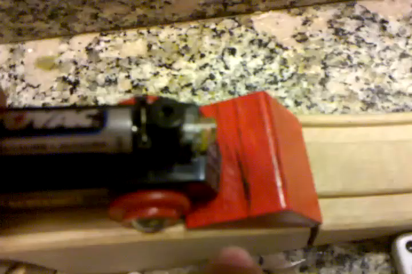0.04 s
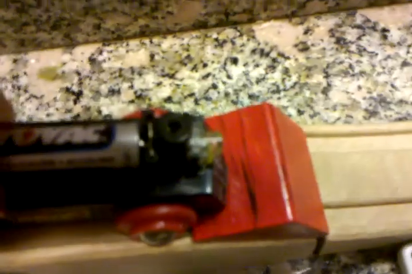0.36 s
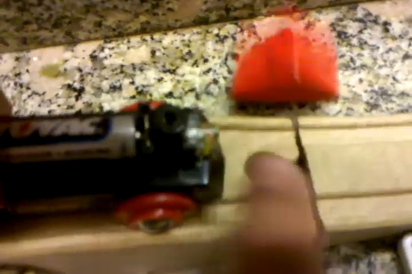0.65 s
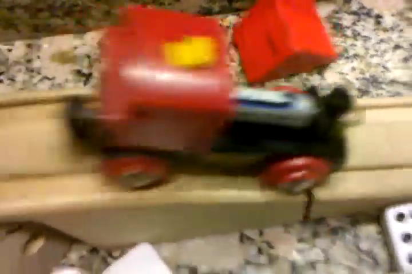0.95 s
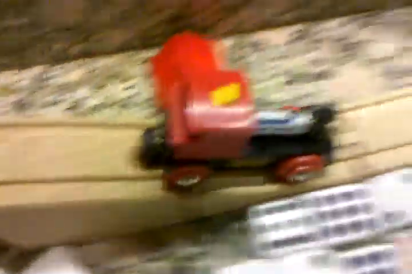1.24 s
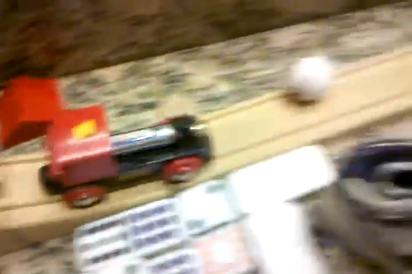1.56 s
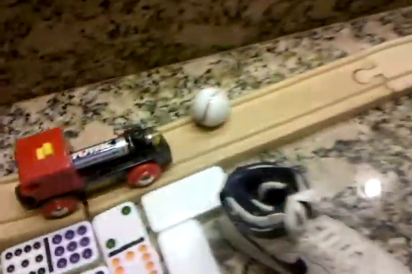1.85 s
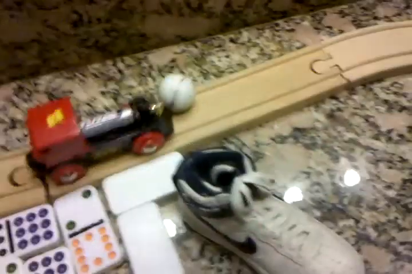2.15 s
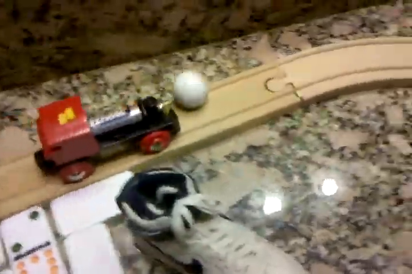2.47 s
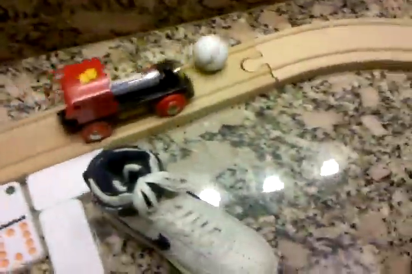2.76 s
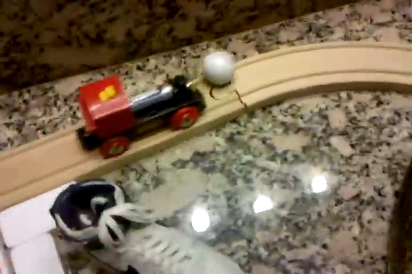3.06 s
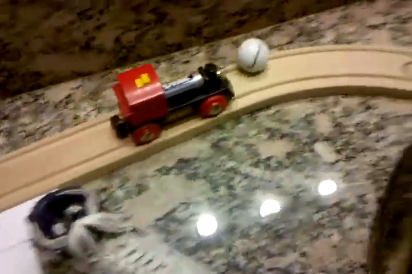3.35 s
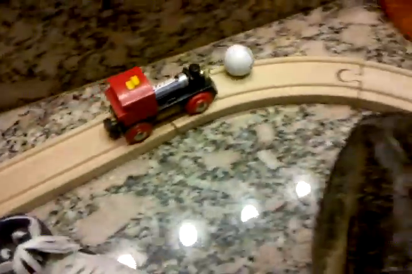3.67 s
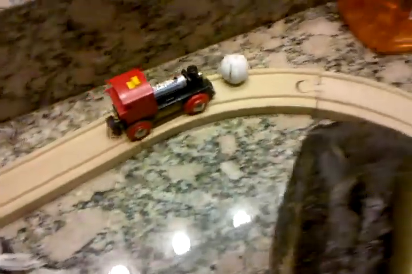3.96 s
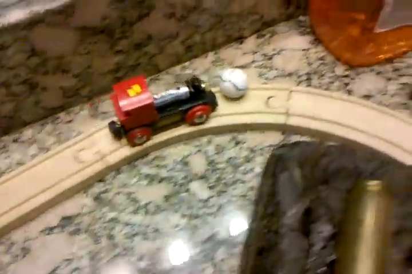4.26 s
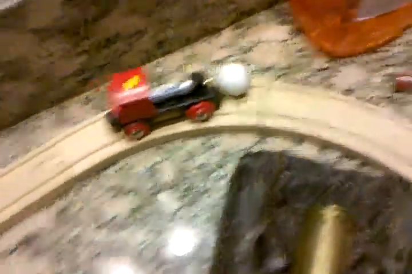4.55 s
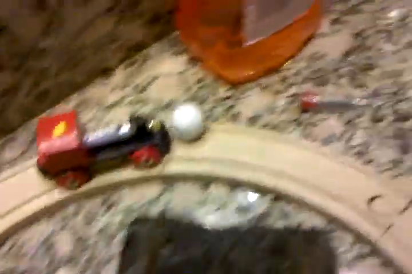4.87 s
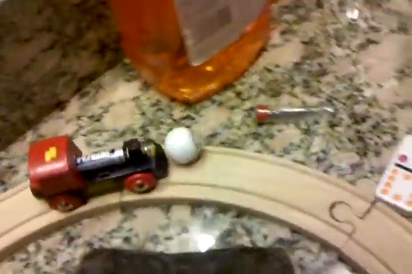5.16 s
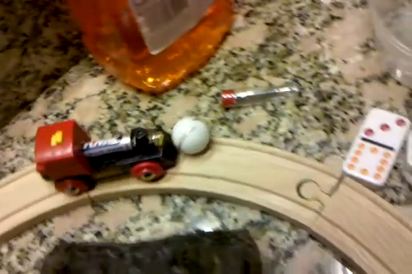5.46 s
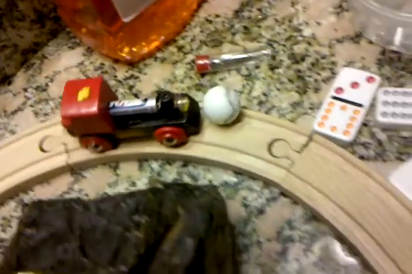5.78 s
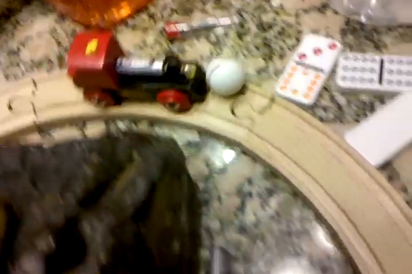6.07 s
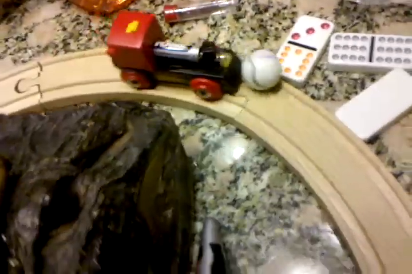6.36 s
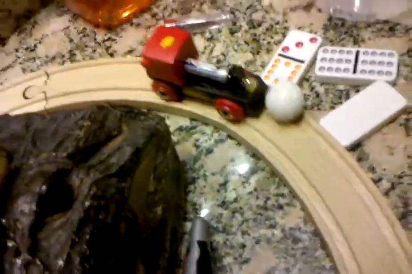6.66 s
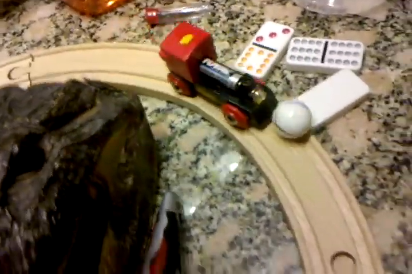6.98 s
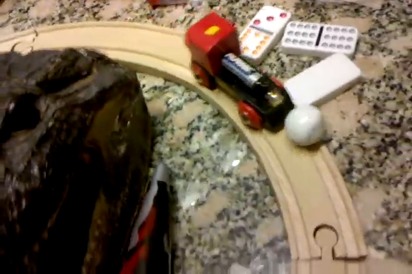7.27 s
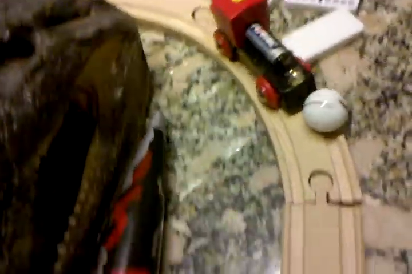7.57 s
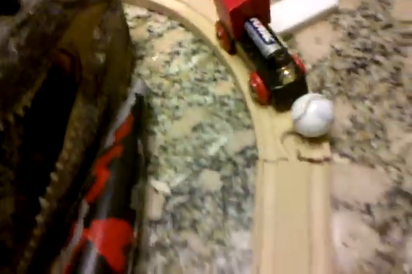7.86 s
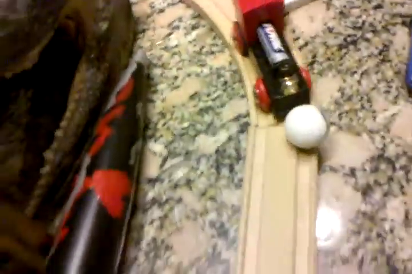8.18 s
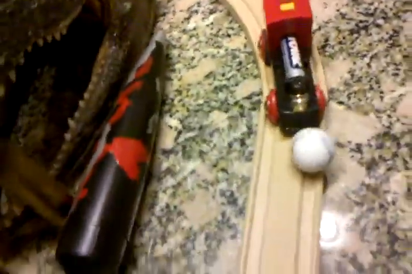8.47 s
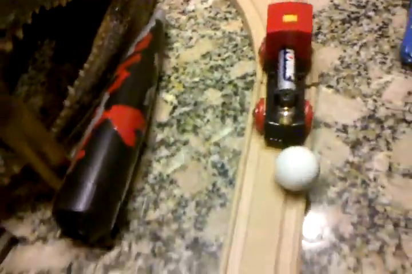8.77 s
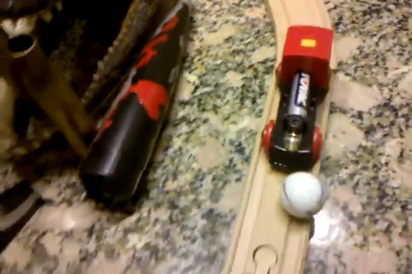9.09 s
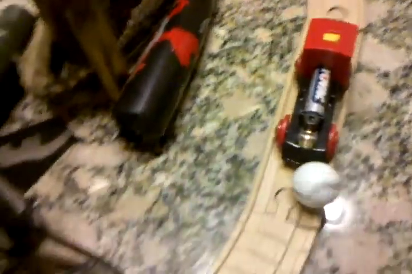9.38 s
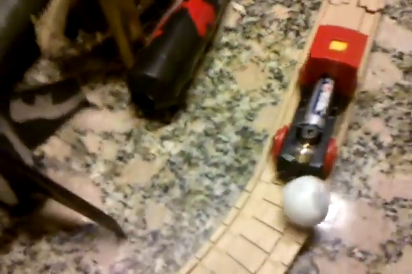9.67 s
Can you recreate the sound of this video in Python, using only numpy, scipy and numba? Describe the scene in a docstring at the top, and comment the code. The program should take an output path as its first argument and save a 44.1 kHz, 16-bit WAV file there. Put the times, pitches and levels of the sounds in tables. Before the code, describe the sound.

Plastic gears snap, then a toy train's motor runs with a high, wavering whir, its wheels rumbling softly over wood.

```python
"""A stone counter in a small hard room: a battery toy train runs on a wooden track, pushing a ball.
Its plastic gears snap and grind as it sets off, then whir as loose, uneven tooth strikes ring the
engine's parts. Wheels and ball rumble and bump on the wood, and the shaking engine makes the track
drone. A few dull knocks sound close to the microphone, something clinks once, an appliance hums."""
import sys
import numpy as np
from scipy import signal
from scipy.fft import rfft, irfft
from scipy.io import wavfile
from scipy.ndimage import uniform_filter1d
from numba import njit

SR = 44100
rng = np.random.default_rng(int(sys.argv[2]) if len(sys.argv) > 2 else 0)


def digitize_waveform(pressure):
    """Quantize a signal to 16-bit integers and store it at the path in sys.argv[1].

    Rows of a 2-D input are taken as channels; values are limited to [-1, 1].
    """
    field = np.atleast_2d(pressure).T
    bounded = np.clip(field, -1, 1)
    quanta = np.round(bounded * 32767).astype(np.int16)
    wavfile.write(sys.argv[1], SR, quanta)


N = 437913
TIME_S = np.arange(N) / SR

MOTOR_HZ, SLOWING_HZ_PER_S, SAG_HZ_PER_DB, MOTOR_WAVER = 97.8, 1.3, 1.0, .04
SHELL_LOAD_SHARE, CHASSIS_LOAD_SHARE, AXLE_LOAD_SHARE = 0.26, 0.12, 0.8
# Gears straining or running slack. Each row: middle in seconds, length in seconds, load in dB.
LOAD_SWELLS = [(1.04, .09, 9), (1.25, .24, 4), (1.58, 0.072, -4), (2.1, 0.11, -3), (2.23, 0.093, 9),
               (2.45, 0.095, 1.5), (2.928, 0.0091, 4), (2.98, 0.18, 3), (3.38, 0.12, 1), (3.6, 0.11, -5),
               (3.85, .15, -1.5), (4.12, 0.17, 1), (4.74, 0.36, 7), (5.15, 0.11, -2), (5.43, 0.15, 4.5),
               (5.65, .19, 6.5), (6.04, .14, 4.5), (6.57, .14, 4), (6.69, 0.018, 9.5), (6.85, .12, -2),
               (7.12, 0.21, 2.5), (7.328, .012, 5), (7.42, .18, 4.3), (7.6, .08, 3.5), (7.76, 0.15, 3),
               (8.04, 0.19, -3.5), (8.35, 0.15, 1), (8.8, 0.17, 3), (9.2, .15, -1), (9.59, 0.082, -6.5),
               (9.72, 0.063, 3)]


def gears():
    """Tooth strikes ring the engine's parts; load slows the motor and makes the whir louder."""
    load_db = swells(LOAD_SWELLS) + .5 * walk(14)
    speed_hz = MOTOR_HZ - SLOWING_HZ_PER_S * TIME_S - SAG_HZ_PER_DB * load_db
    turns = np.cumsum(speed_hz * (1 + MOTOR_WAVER * walk(9))) / SR
    strikes = tooth_strikes(turns, teeth=14, scatter_db=3.5, backlash=.18,
                            shaft_db=1.3, wheel_db=0.86, wheel_ratio=4.4, flutter_db=0.88)
    whir = gearbox(strikes, load_db, flank_db=-7.0)
    whir += undb(SHELL_LOAD_SHARE * load_db) * shell(strikes)
    whir += undb(CHASSIS_LOAD_SHARE * load_db) * chassis(strikes)
    whir += undb(AXLE_LOAD_SHARE * load_db) * axle(strikes)
    whir += tooth_edges(strikes, gain_db=3, ring_db=-1.5)
    running_free = np.interp(TIME_S, [1.02, 1.15], [0, 1])
    return running_free * whir + grinding(turns)


def tooth_strikes(turns, teeth, scatter_db, backlash, shaft_db, wheel_db, wheel_ratio, flutter_db):
    """Teeth strike early or late in their backlash; off-centre gears press harder once a turn."""
    at = np.flatnonzero(np.diff(np.floor(turns * teeth)))
    timing, force = rng.standard_normal((len(at), 2)).T
    jitter = (backlash * np.median(np.diff(at)) * timing).astype(int)
    at = np.clip(at + jitter, 0, N - 1)
    press_db = shaft_db * np.cos(2 * np.pi * turns) + wheel_db * np.cos(2 * np.pi * turns / wheel_ratio)
    press_db += flutter_db * walk(60)
    return np.bincount(at, undb(scatter_db * force + press_db[at]), N)


GEARBOX_DB, SCREENING_DB, TURN_SPAN_S = -45, 3.5, (7.9, 9.1)
NOTE_DROP_HZ_PER_DB, FLANK_LOAD_SHARE = 6, 0.31
# Main resonance as the engine turns. Each row: time in seconds, centre in Hz, width in Hz.
GEARBOX_NOTE = [(1.2, 3740, 522), (1.5, 3580, 522), (3.1, 3640, 390), (4.3, 3600, 470), (5.9, 3600, 450),
                (7.1, 3560, 363), (7.45, 3570, 490), (7.72, 3710, 499), (8.3, 3600, 613), (8.7, 3450, 540),
                (9.0, 3500, 565), (9.4, 3620, 640)]
# Flanking resonances. Each row: centre in Hz, width in Hz, relative level in dB.
GEARBOX_MODES = [(2940, 890, -14), (3280, 440, -2.5), (3980, 350, -9)]


def gearbox(strikes, load_db, flank_db):
    """One strong moving resonance between weaker ones; load lowers it and brings the others up."""
    hz, width_hz = curves(GEARBOX_NOTE)
    drive = chatter(strikes, bounce_s=.0005, count=len(GEARBOX_MODES) + 1)
    note = sweep(drive[-1], hz - NOTE_DROP_HZ_PER_DB * load_db + 32 * walk(5.3), width_hz)
    flank_gain = undb(flank_db + FLANK_LOAD_SHARE * load_db)
    ringing = (unit(note) + flank_gain * resonate(drive, GEARBOX_MODES)) / np.hypot(1, flank_gain)
    # Swinging round to face the microphone, the engine screens its gearbox.
    facing = np.interp(TIME_S, TURN_SPAN_S, [0, 1])
    return undb(GEARBOX_DB - SCREENING_DB * facing + load_db) * ringing


# Each row: centre in Hz, width in Hz, relative level in dB.
SHELL_MODES = [(1746, 390, -9), (2050, 680, -4.5), (2750, 1330, -7)]
# Each row: time in seconds, gain of the modes in dB.
SHELL_GAIN = [(1.3, -53.5), (2.0, -56.5), (3.1, -55), (3.7, -50), (4.6, -49.5), (5.9, -51), (6.5, -49.5),
              (7.7, -52), (8.3, -50.5), (8.9, -54), (9.8, -55.5)]
# Strongest resonance. Each row: time in seconds, centre in Hz, gain in dB.
SHELL_RING = [(1.2, 2160, -56.5), (1.68, 2110, -50.5), (1.97, 2010, -58), (2.25, 1915, -55),
              (3.04, 1970, -62.5), (3.35, 2206, -54.5), (3.9, 2050, -54.5), (4.6, 2010, -59),
              (5.6, 1976, -55), (5.9, 2136, -64.5), (6.65, 2160, -52), (7.3, 1980, -58.5),
              (7.77, 2050, -68), (8.37, 2170, -56.5), (9.17, 2080, -52), (9.55, 2100, -47),
              (9.9, 2115, -45.5)]


def shell(strikes):
    """The strikes ring the engine's shell near 2 kHz."""
    band = mode_band(strikes, SHELL_MODES, SHELL_GAIN, bounce_s=0.0059)
    return band + moving_note(strikes, SHELL_RING, width_hz=390, bounce_s=0.0026)


# Each row: centre in Hz, width in Hz, relative level in dB.
CHASSIS_MODES = [(4180, 790, -1), (4700, 930, -6), (5160, 670, -7.5)]
# Each row: time in seconds, gain of the modes in dB.
CHASSIS_GAIN = [(1.9, -57), (2.6, -50.5), (3.05, -53), (3.7, -51), (4.6, -45.5), (5.1, -53), (7.0, -52),
                (7.35, -47.5), (7.8, -59), (9.8, -51)]
# Strongest resonance. Each row: time in seconds, centre in Hz, gain in dB.
CHASSIS_RING = [(1.3, 4590, -55.5), (2.0, 4640, -58), (2.7, 4530, -58), (3.08, 4340, -47.5),
                (3.6, 4520, -61), (4.15, 4380, -51.5), (4.65, 4600, -49), (5.2, 4550, -58.5),
                (6.3, 4690, -52), (6.95, 4700, -58), (7.38, 4640, -53), (8.05, 4700, -51.5),
                (8.8, 4590, -54), (9.7, 4380, -54)]


def chassis(strikes):
    """The strikes ring the chassis broadly near 4.5 kHz."""
    band = mode_band(strikes, CHASSIS_MODES, CHASSIS_GAIN, bounce_s=0.00054)
    return band + moving_note(strikes, CHASSIS_RING, width_hz=580, bounce_s=0.00055)


# Each row: time in seconds, centre in Hz, gain in dB.
AXLE_RING = [(1.2, 5930, -56), (1.65, 5920, -52), (2.3, 5850, -55.5), (2.75, 5920, -48), (3.2, 5900, -53.5),
             (3.8, 5820, -53), (4.75, 5800, -49), (5.2, 5790, -57.5), (5.7, 6020, -52), (6.3, 5930, -55.5),
             (7.0, 5920, -54), (7.7, 6000, -54.5), (8.1, 5930, -48.5), (8.55, 5940, -49),
             (8.85, 5920, -51.5), (9.2, 5840, -49.5), (9.8, 6010, -46.5)]


def axle(strikes):
    """The strikes ring the axle near 5.9 kHz."""
    return moving_note(strikes, AXLE_RING, width_hz=460, bounce_s=0.0005)


# Hiss band. Each row: centre in Hz, width in Hz, relative level in dB.
EDGE_BAND = [(6500, 4700, 0)]
# Each row: time in seconds, centre in Hz, relative level in dB.
EDGE_RING = [(1.2, 6910, -4.5), (2.0, 6580, -2), (2.8, 6660, -4), (4.7, 6650, -3), (5.1, 6580, 0.5),
             (5.7, 6600, -2.5), (6.5, 6820, -6.5), (7.4, 6800, -5), (8.1, 6300, -6), (8.8, 6730, -5),
             (9.8, 6760, -1.5)]
# Hiss and ring together. Each row: time in seconds, relative level in dB.
EDGE_GAIN = [(1.2, -46.5), (1.8, -53.5), (2.0, -48.5), (2.12, -54), (2.22, -52), (2.4, -53), (2.62, -51.5),
             (2.76, -47), (2.86, -48), (3.0, -44.5), (3.09, -47), (3.35, -46), (3.65, -49.5), (3.87, -50),
             (4.0, -46), (4.55, -47.5), (4.75, -42.5), (5.0, -46.5), (5.45, -48.5), (5.65, -45),
             (6.1, -48.5), (6.65, -45), (6.8, -52), (7.1, -47.5), (7.7, -47.5), (8.05, -47), (8.65, -46.5),
             (9.45, -48.5), (9.6, -51), (9.7, -46.5), (9.9, -47.5)]


def tooth_edges(strikes, gain_db, ring_db):
    """The tooth edges hiss over a broad band, with a ring that shifts as the engine turns."""
    hiss = resonate(chatter(strikes, bounce_s=0.00032, count=1), EDGE_BAND)
    note = moving_note(strikes, EDGE_RING, width_hz=620, bounce_s=0.00034)
    return undb(gain_db + curves(EDGE_GAIN)[0]) * unit(hiss + undb(ring_db) * note)


# Colour of snaps and grinding. Each row: frequency in Hz, relative level in dB.
CLATTER_SPECTRUM = [(100, -32.5), (190, -20), (650, -25), (990, -18), (1250, -18), (2000, -13),
                    (2800, -12.5), (3450, -4.5), (4000, -8), (4700, -6.5), (5500, -13), (6600, -14.5),
                    (7500, -20)]
# Each row: start in seconds, level in dB, emphasised frequency in Hz.
TOOTH_SNAPS = [(0.834, -15, 3200), (0.85, -18.5, 4100), (0.8642, -20, 3200), (0.891, -17, 3300),
               (0.918, -15, 4700), (0.9304, -14, 4950), (0.9423, -13.5, 4900), (0.958, -16.5, 3800),
               (0.9786, -14.5, 4400), (0.991, -11.5, 3430), (1.001, -18, 4280), (1.0133, -10.5, 3580),
               (1.043, -11.5, 3600), (1.052, -19, 3600), (1.073, -18, 3400), (1.0833, -13, 3320),
               (1.0898, -11.5, 3420), (1.1054, -18, 6000), (1.1156, -25, 4500), (3.503, -18, 6000),
               (5.4106, -20, 3615), (5.7367, -23.5, 3604), (7.4486, -23, 3530), (7.5621, -24, 3600)]


def snaps(rattle_db, rattle_s, ring_db, ring_octaves):
    """A slipping tooth cracks, lifted round its own pitch, and the loose gears rattle after it."""
    out, t = np.zeros(N), np.arange(SR // 20) / SR
    hz, colour_db = np.transpose(CLATTER_SPECTRUM)
    for s, db, snap_hz in TOOTH_SNAPS:
        slip = (t == 0) + undb(rattle_db) * np.exp(-t / rattle_s) * rng.standard_normal(len(t))
        lift_db = ring_db * np.exp(-(np.log2(hz / snap_hz) / ring_octaves) ** 2)
        snap = signal.fftconvolve(slip, blow_response(np.column_stack([hz, colour_db + lift_db])))
        out[int(s * SR):int(s * SR) + len(snap)] += undb(db) * snap
    return out


# Each row: start of hold in seconds, hold in seconds, level in dB, release in seconds.
GRIND_BURSTS = [(0.813, 0.024, -51, .02), (0.845, 0.021, -36.5, 0.032), (0.93, 0.013, -31, 0.032),
                (0.989, 0.039, -34, 0.023), (1.055, 0.062, -32.5, 0.027)]


def grinding(turns, attack_s=0.006):
    """Setting off, the loaded gears rasp in bursts that rise, hold and die away."""
    envelope = np.zeros(N)
    for s, hold_s, db, release_s in GRIND_BURSTS:
        rise = np.clip((TIME_S - s) / attack_s + 1, 0, 1)
        envelope += undb(db) * rise * np.exp(-np.maximum(TIME_S - s - hold_s, 0) / release_s)
    strikes = tooth_strikes(turns, teeth=5, scatter_db=2.5, backlash=0.072,
                            shaft_db=1.5, wheel_db=-1.0, wheel_ratio=5.9, flutter_db=2.0)
    rasp = chatter(strikes, bounce_s=0.00066, count=1)[0]
    return envelope * unit(through(rasp, blow_response(CLATTER_SPECTRUM)))


ROLL_DB, ROLL_FADE_DB_PER_S = -57.5, 0.22
# Track under rolling wheels. Each row: frequency in Hz, relative level in dB.
ROLL_SPECTRUM = [(70, -5), (130, 0), (200, 3), (330, -2.5), (520, -3), (760, -4.5), (980, -2), (1400, -0.5),
                 (2000, -2.5), (4000, -24.5)]
# Rough and smooth wood. Each row: middle in seconds, length in seconds, rise in dB.
ROUGHNESS = [(2.85, 0.73, 5.5), (4.6, 1, 0.5), (4.86, 0.097, 5.5), (6.53, 0.2, 3), (8.25, 0.33, 2.5),
             (9.1, 1, -3), (9.85, 0.45, 2.5)]
# Joints and grooves. Each row: start in seconds, level in dB.
JOINT_BUMPS = [(2.613, -44.5), (2.701, -52), (2.77, -39), (3.572, -40), (4.47, -41), (4.81, -40.5),
               (4.858, -42), (5.05, -45.5), (6.409, -40.5), (6.443, -37), (6.637, -41), (6.704, -42.5),
               (8.167, -41.5), (9.8, -42.5)]
# Bumped wood. Each row: frequency in Hz, relative level in dB.
BUMP_SPECTRUM = [(90, -26), (200, -10), (330, -3), (460, -0.5), (620, -3.5), (920, -2.5), (1300, -6.5),
                 (2000, -14.5), (4000, -25)]


def rolling(grain_db, rattle_db, tick_db, tick_scatter_db, speck_count):
    """Wood grain shakes the track, specks tick under wheels and ball, joints bump and rattle."""
    grain = rng.standard_normal(N) * undb(grain_db * walk(170))
    rumble = unit(through(grain, blow_response(ROLL_SPECTRUM)))
    gain = undb(ROLL_DB - ROLL_FADE_DB_PER_S * TIME_S + swells(ROUGHNESS))
    speck_at = rng.integers(0, N, speck_count)
    specks = np.bincount(speck_at, undb(tick_db + tick_scatter_db * rng.standard_normal(speck_count)), N)
    joints = blows(JOINT_BUMPS)
    bumps = joints + undb(rattle_db) * chatter(joints, bounce_s=0.0072, count=1)[0]
    return gain * rumble + through(bumps + gain * specks, blow_response(BUMP_SPECTRUM))


# Each row: start in seconds, level in dB.
BALL_HITS = [(2.214, -39), (2.242, -28), (2.298, -40), (2.380, -40), (2.453, -36.5), (2.670, -40),
             (2.748, -40)]
# Each row: frequency in Hz, relative level in dB.
BALL_SPECTRUM = [(150, -12.5), (430, -5.5), (660, -6), (930, 1.5), (1150, -6), (1500, -16.5), (3000, -35)]


def ball():
    """The engine catches up with the ball, which taps on the wood."""
    return through(blows(BALL_HITS), blow_response(BALL_SPECTRUM))


# Each row: start in seconds, then for thud and tick in turn: level in dB, pitch in Hz, t60 in seconds.
CLOSE_KNOCKS = [(2.7942, -26, 302, 0.032, -31, 1700, 0.0056),
                (2.8635, -29, 283.6, 0.047, -26, 1492, 0.0024),
                (3.1847, -35.5, 296, 0.091, -2.5, 5900, 0.00063),
                (3.1861, -16.5, 1390, 0.0041, -39, 2820, 0.0016),
                (3.475, -14, 180.7, 0.0086, -25, 802, 0.0027)]


def knocks(thud_contact_s, tick_contact_s):
    """A hard tick and a quickly damped thud, too close to carry any room."""
    out = np.zeros(N)
    for s, thud_db, thud_hz, thud_t60_s, tick_db, tick_hz, tick_t60_s in CLOSE_KNOCKS:
        thud = undb(thud_db) * ring(thud_hz, thud_t60_s, thud_contact_s)
        tick = undb(tick_db) * ring(tick_hz, tick_t60_s, tick_contact_s)
        out[int(s * SR):int(s * SR) + len(thud)] += thud + tick
    return out


# Each row: start in seconds, level in dB.
CLINK_HITS = [(8.425, -31), (8.432, -27), (8.4385, -25.5), (8.4435, -22), (8.465, -28), (8.483, -33),
              (8.503, -38), (8.529, -40)]
# Each row: frequency in Hz, relative level in dB, t60 in seconds.
CLINK_PARTIALS = [(2316, -2.5, 0.035), (2481, 0.5, 0.07), (2590, -20, 0.026)]


def clink(contact_s, rattle_db):
    """A light object chatters against something hard, each blow ringing the same few modes."""
    note = sum(undb(db) * ring(hz, t60_s, contact_s) for hz, db, t60_s in CLINK_PARTIALS)
    hits = blows(CLINK_HITS)
    rattle = undb(rattle_db) * chatter(hits, bounce_s=.008, count=1)[0]
    return through(hits + rattle, note / np.abs(note).max())


# Track on the counter, two groups. Each row: centre in Hz, width in Hz, relative level in dB.
TRACK_DEEP_MODES = [(205, 30, -1.5), (236, 13, 2.5), (304.7, 30.4, -0.5)]
TRACK_UPPER_MODES = [(403.2, 17, -0.5), (434.8, 17, -1.5), (466, 15, -7)]
# Each row: time in seconds, deep gain in dB, upper gain in dB.
DRONE_GAINS = [(.9, -85, -67), (1.2, -65.5, -84), (4.2, -60.5, -77), (5.6, -60, -70), (6.5, -65.5, -65.5),
               (9.5, -70, -70.5), (9.85, -63, -64)]


def track_drone():
    """The shaking engine keeps the low resonances of the track going."""
    deep_db, upper_db = curves(DRONE_GAINS)
    deep = resonate(rng.standard_normal((len(TRACK_DEEP_MODES), N)), TRACK_DEEP_MODES)
    upper = resonate(rng.standard_normal((len(TRACK_UPPER_MODES), N)), TRACK_UPPER_MODES)
    return undb(deep_db) * deep + undb(upper_db) * upper


# Each row: frequency in Hz, wander rate in Hz, relative level in dB.
HUM_TONES = [(118, 6, 0.4), (203.3, 8, -5.5), (239.3, 3.9, -9.5)]
# Hum as the microphone moves. Each row: time in seconds, gain in dB.
HUM_GAIN = [(.85, -75.5), (1.3, -69), (2.1, -72), (2.9, -68.5), (4.1, -65), (4.55, -69), (4.85, -63.5),
            (5.4, -66), (6.05, -69), (6.45, -77), (7.1, -69), (7.7, -65), (8.7, -70.5), (9.1, -66),
            (9.9, -67)]


def appliance_hum(waver):
    """Faint low tones wander in level and phase."""
    tones = np.zeros(N)
    for hz, wander_hz, db in HUM_TONES:
        envelope = 1 + waver * walk(wander_hz)
        tones += undb(db) * unit(envelope * np.cos(2 * np.pi * hz * TIME_S + walk(wander_hz)))
    return undb(curves(HUM_GAIN)[0]) * tones


def room(x, near_db, near_t60_s, far_db, far_t60_s, places):
    """Counter and wall answer at once, the room later; the echoes change along the track."""
    t = np.arange(SR // 2) / SR
    hop = N // places
    fade = np.sin(np.pi * np.arange(2 * hop) / (2 * hop))
    out = np.pad(x, (0, SR))
    for start in range(0, N, hop):
        response = 0
        for db, t60_s, delay_s in ((near_db, near_t60_s, .0015), (far_db, far_t60_s, .008)):
            tail = rng.standard_normal(len(t)) * np.exp(-np.log(1000) * t / t60_s) * (t > delay_s)
            response = response + undb(db) * tail / np.linalg.norm(tail)
        piece = x[start:start + 2 * hop]
        echo = signal.fftconvolve(piece * fade[:len(piece)], response)
        out[start:start + len(echo)] += echo
    return out[:N] / np.sqrt(1 + undb(near_db) ** 2 + undb(far_db) ** 2)


def chatter(strikes, bounce_s, count):
    """Each strike dies out in a burst of tiny bounces; count independent signals."""
    energy = signal.lfilter([1], [1, -np.exp(-1 / (bounce_s * SR))], strikes ** 2 + 1e-18)
    return np.sqrt(energy) * rng.standard_normal((count, N))


def mode_band(strikes, modes, gains, bounce_s):
    """The modes of one engine part, rung by the tooth strikes."""
    return undb(curves(gains)[0]) * resonate(chatter(strikes, bounce_s, count=len(modes)), modes)


def moving_note(strikes, table, width_hz, bounce_s):
    """A part's strongest resonance, shifting and swelling as the engine turns."""
    hz, db = curves(table)
    drive = chatter(strikes, bounce_s, count=1)[0]
    return undb(db) * unit(sweep(drive, hz, np.full(N, float(width_hz))))


def resonate(drives, modes, drift=.005):
    """One drive per resonance, each drifting in pitch as the train moves; rms 1."""
    return unit(sum(undb(db) * sweep(drive, hz * (1 + drift * walk(4)), np.full(N, float(width_hz)))
                    for drive, (hz, width_hz, db) in zip(drives, modes)))


@njit
def sweep(x, hz, width_hz):
    """Two state-variable band-passes in series; centre and width move every sample."""
    out, band_state, low_state = np.empty(len(x)), np.zeros(2), np.zeros(2)
    for i in range(len(x)):
        g, damping, sample = np.tan(np.pi * hz[i] / SR), width_hz[i] / hz[i], x[i]
        for j in range(2):
            band = (band_state[j] + g * (sample - low_state[j])) / (1 + g * (g + damping))
            band_state[j] = 2 * band - band_state[j]
            low_state[j] += 2 * g * band
            sample = damping * band
        out[i] = sample
    return out


def blow_response(spectrum, size=2048):
    """Minimum-phase response of a blow with the given (Hz, dB) colour; peak 1."""
    hz, db = np.transpose(spectrum)
    bin_hz = np.maximum(np.arange(size // 2 + 1) * SR / size, 1)
    cepstrum = irfft(np.log(undb(np.interp(np.log(bin_hz), np.log(hz), db))))
    cepstrum[1:size // 2] *= 2
    cepstrum[size // 2 + 1:] = 0
    response = irfft(np.exp(rfft(cepstrum)))
    return response / np.abs(response).max()


def ring(hz, t60_s, contact_s):
    """One mode dying away after a blow; a longer contact rounds its start."""
    t = np.arange(SR // 4) / SR
    return np.cos(2 * np.pi * hz * t) * np.exp(-np.log(1000) * t / t60_s) * (1 - np.exp(-t / contact_s))


def through(x, response):
    """Pass x through an impulse response."""
    return signal.oaconvolve(x, response)[:N]


def blows(table):
    """One impulse per (seconds, dB) row."""
    out = np.zeros(N)
    for s, db in table:
        out[int(s * SR)] += undb(db)
    return out


def swells(table):
    """Sum of smooth humps, one per row; lengths are at half height."""
    return sum(height * np.cos(np.pi / 2 * np.clip((TIME_S - middle_s) / length_s, -1, 1)) ** 2
               for middle_s, length_s, height in table)


def curves(table):
    """Each column after the time as one value per sample."""
    times_s, *columns = np.transpose(table)
    return [np.interp(TIME_S, times_s, column) for column in columns]


def walk(rate_hz):
    """Smooth random wander, spread near 1."""
    hold = int(SR / rate_hz)
    return 1.3 * uniform_filter1d(np.repeat(rng.standard_normal(N // hold + 1), hold), hold)[:N]


def undb(db):
    """Decibels to gain."""
    return 10 ** (np.asarray(db) / 20)


def unit(x):
    """Scale to rms 1."""
    return x / np.sqrt(np.mean(x ** 2))


def scene():
    """Train, track, ball and clink echo in the room; drone, knocks and hum stay dry."""
    sources = gears() + snaps(rattle_db=-21, rattle_s=0.0045, ring_db=9.0, ring_octaves=0.22)
    sources += rolling(grain_db=2.0, rattle_db=-15.5, tick_db=10.0, tick_scatter_db=1, speck_count=140)
    sources += ball() + clink(contact_s=0.00016, rattle_db=-29.5)
    mix = room(sources, near_db=-7.5, near_t60_s=0.026, far_db=-8.0, far_t60_s=0.37, places=48)
    mix += track_drone() + knocks(thud_contact_s=.00005, tick_contact_s=.00001)
    return (mix + appliance_hum(waver=0.52))[None]


OPEN_S, FIZZ_DB, TOP_HZ = .811, -29, 8800


def record(dry):
    """A small microphone: silent until it opens, thin in the bass, treble cut but for a faint fizz."""
    opened = dry * (TIME_S > OPEN_S)
    thin = signal.sosfilt(signal.butter(4, 78, "high", fs=SR, output="sos"), opened)
    dull = signal.sosfilt(signal.butter(28, 7020, fs=SR, output="sos"), thin)
    top_cut = signal.ellip(8, .2, 70, TOP_HZ, fs=SR, output="sos")
    return signal.sosfilt(top_cut, dull + undb(FIZZ_DB) * thin)


dry = scene()
out = record(dry)
digitize_waveform(out)
```